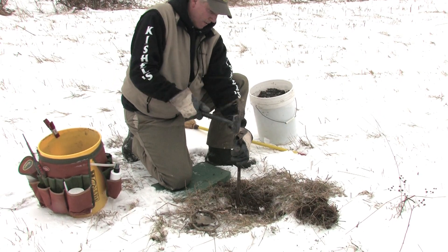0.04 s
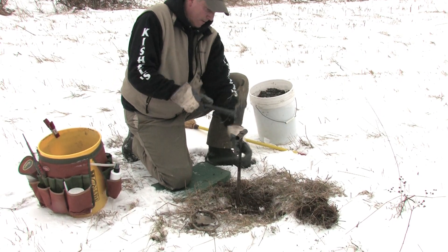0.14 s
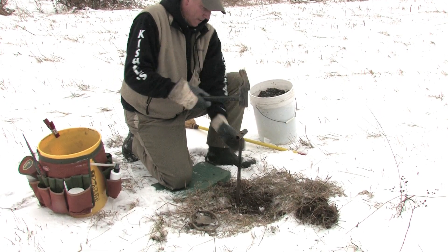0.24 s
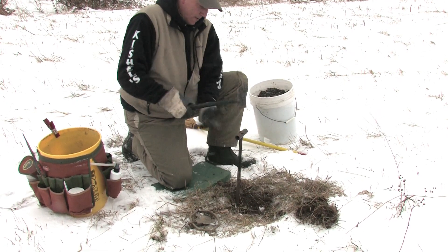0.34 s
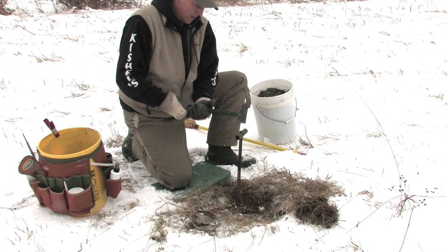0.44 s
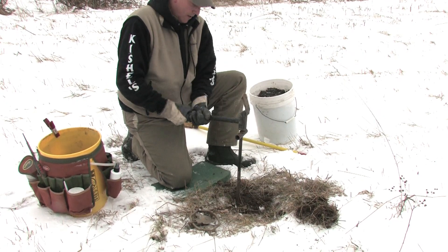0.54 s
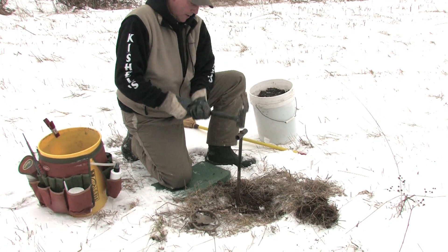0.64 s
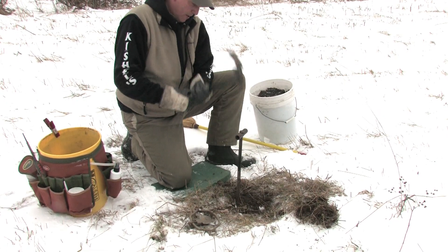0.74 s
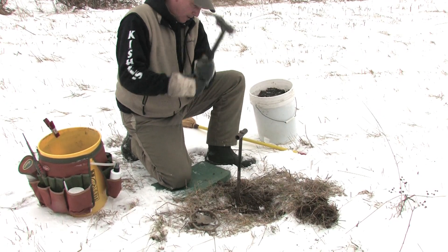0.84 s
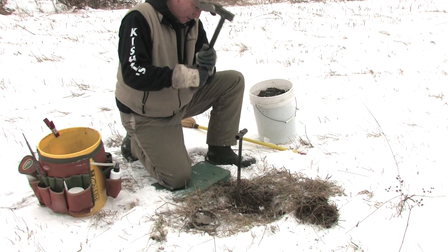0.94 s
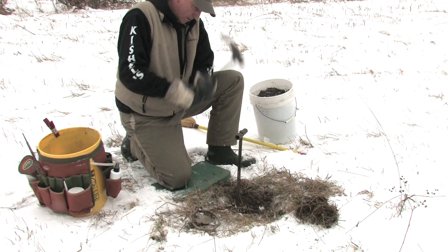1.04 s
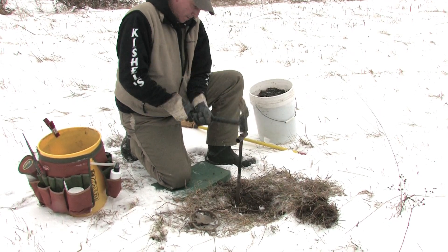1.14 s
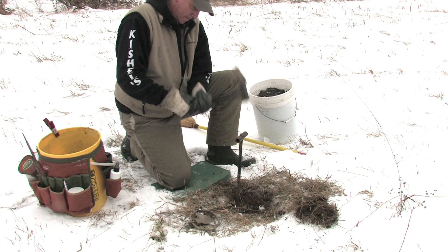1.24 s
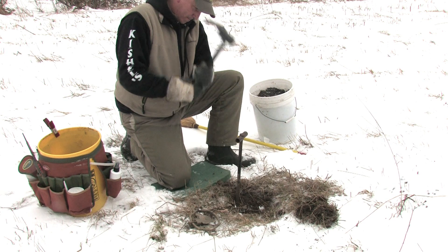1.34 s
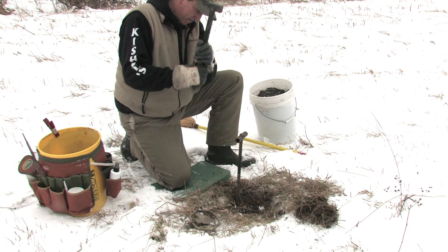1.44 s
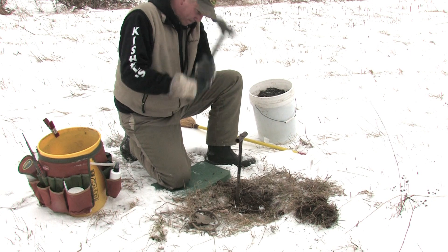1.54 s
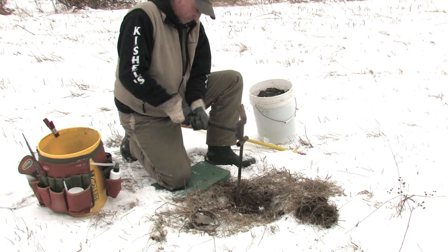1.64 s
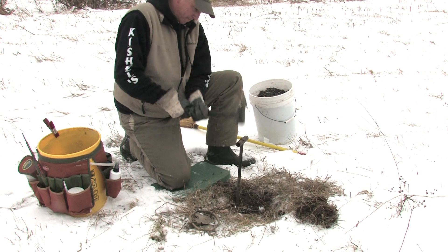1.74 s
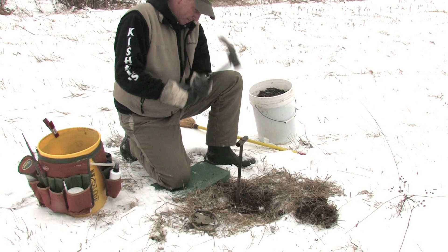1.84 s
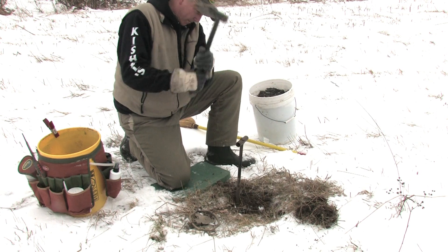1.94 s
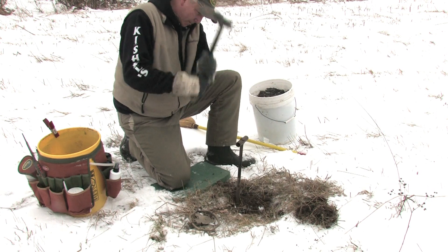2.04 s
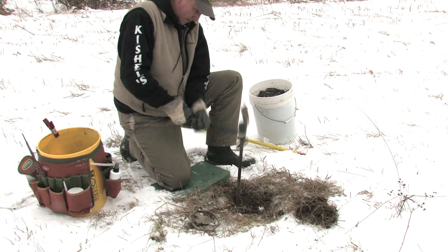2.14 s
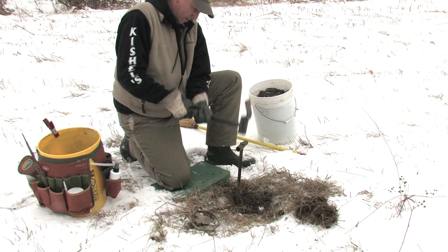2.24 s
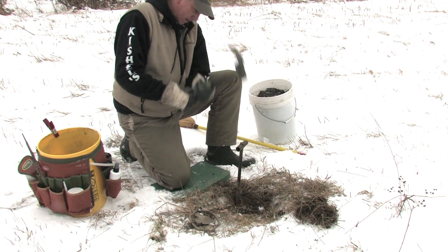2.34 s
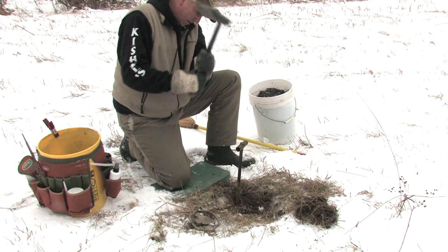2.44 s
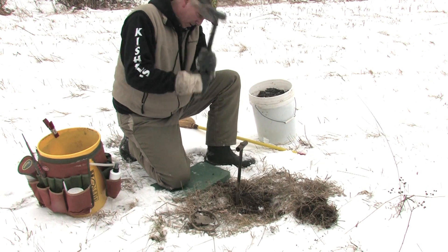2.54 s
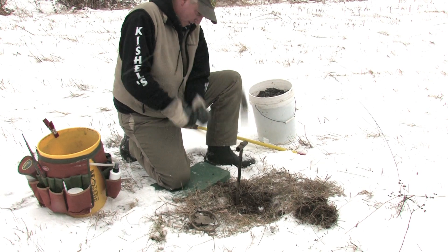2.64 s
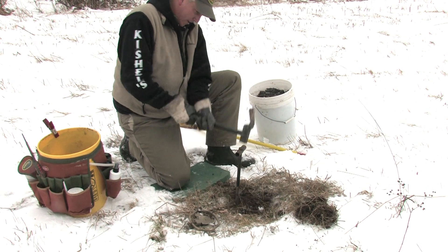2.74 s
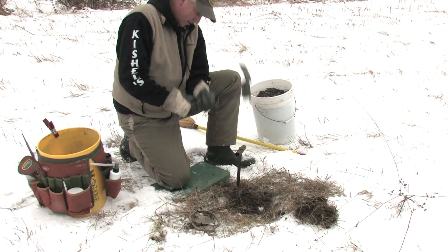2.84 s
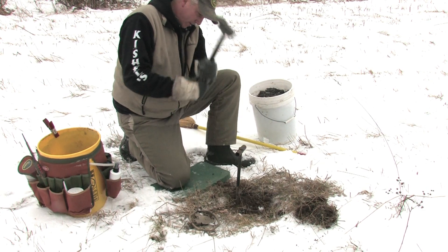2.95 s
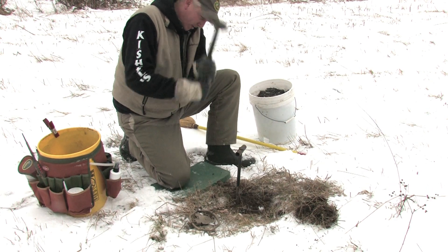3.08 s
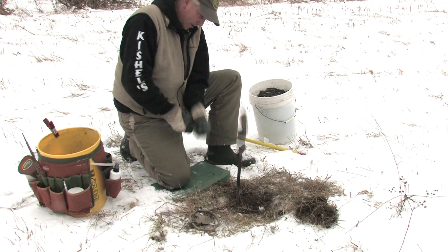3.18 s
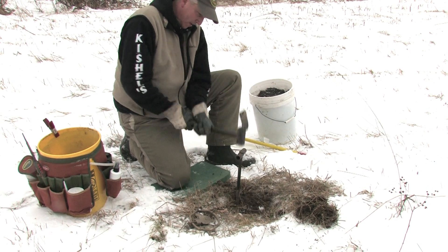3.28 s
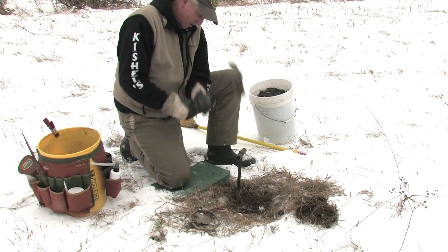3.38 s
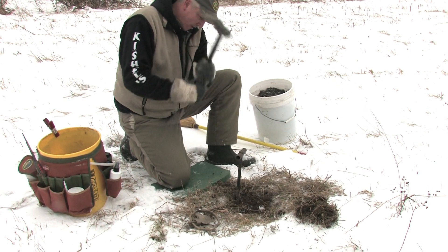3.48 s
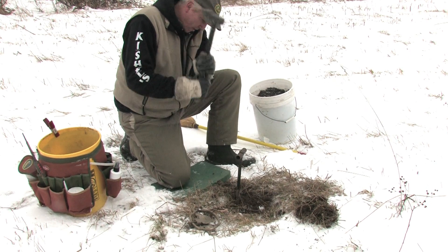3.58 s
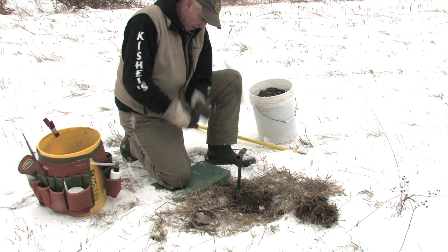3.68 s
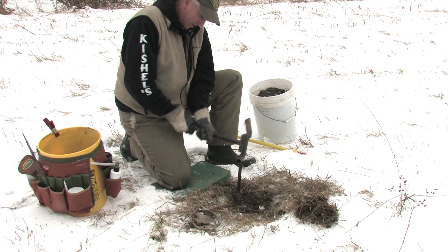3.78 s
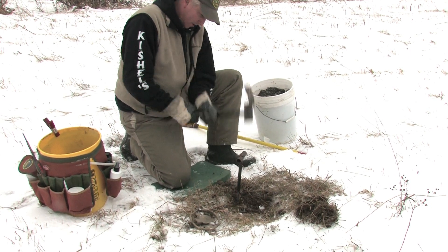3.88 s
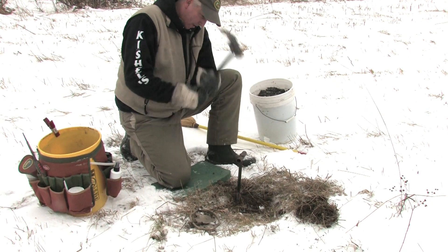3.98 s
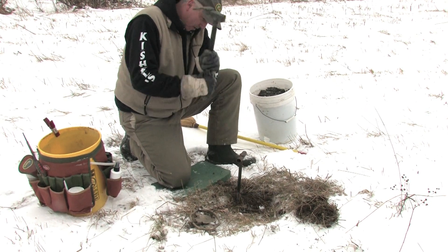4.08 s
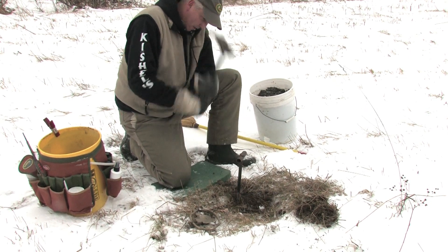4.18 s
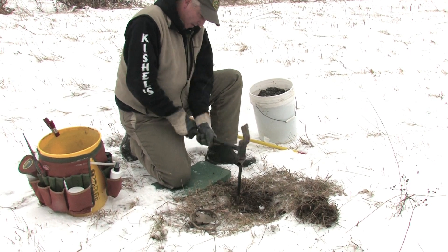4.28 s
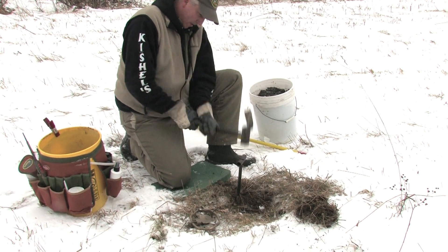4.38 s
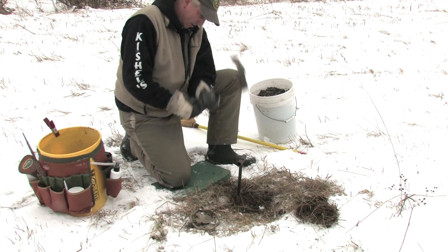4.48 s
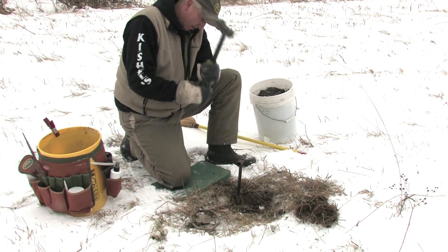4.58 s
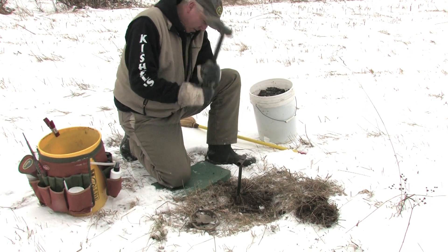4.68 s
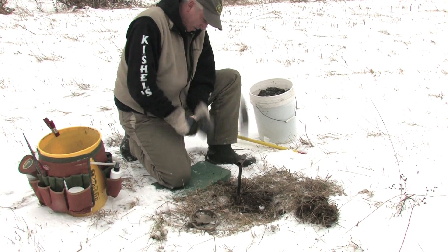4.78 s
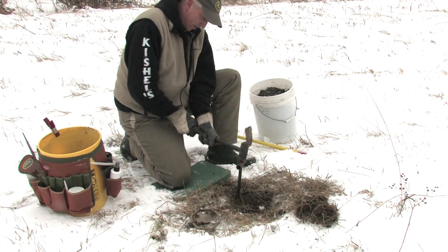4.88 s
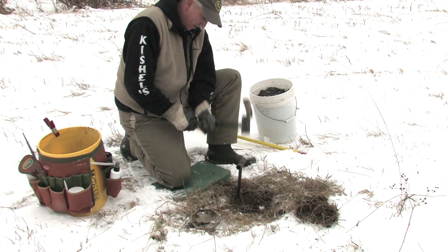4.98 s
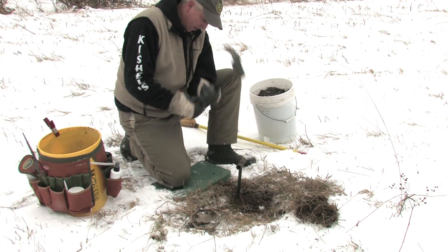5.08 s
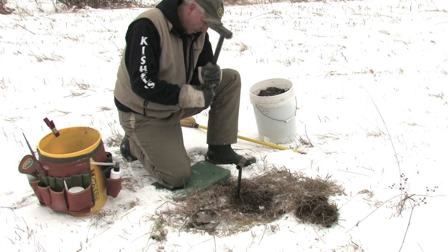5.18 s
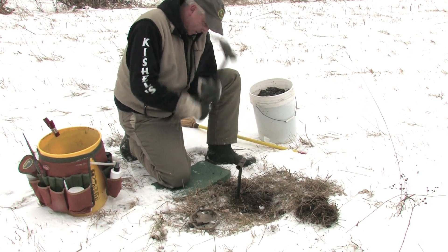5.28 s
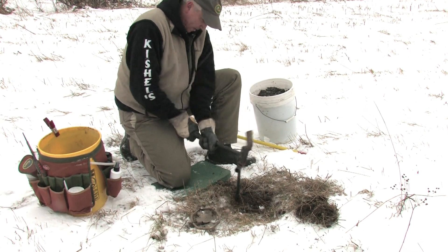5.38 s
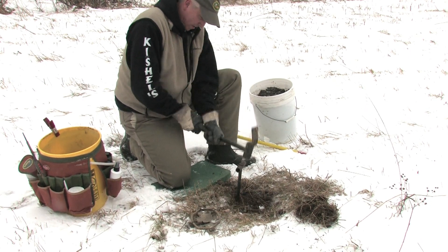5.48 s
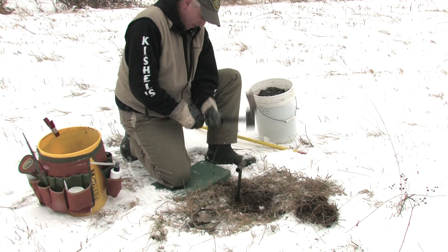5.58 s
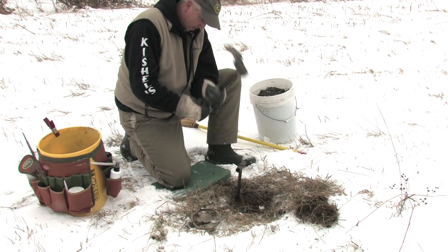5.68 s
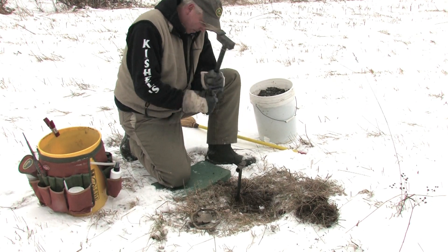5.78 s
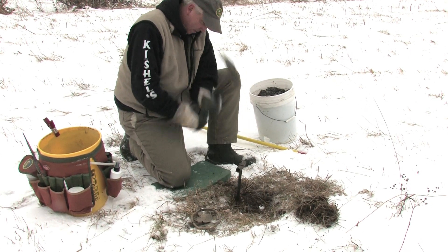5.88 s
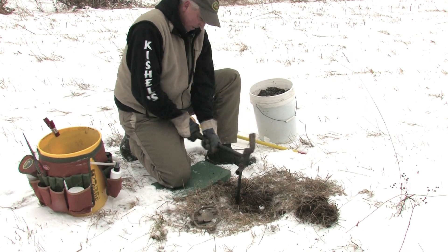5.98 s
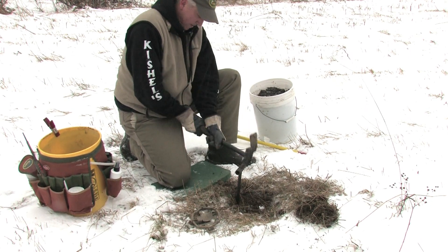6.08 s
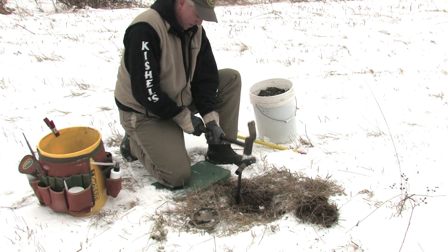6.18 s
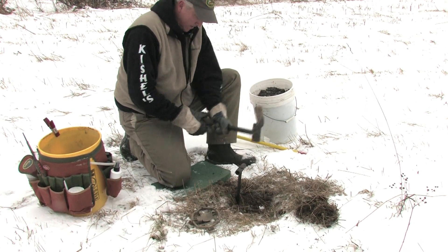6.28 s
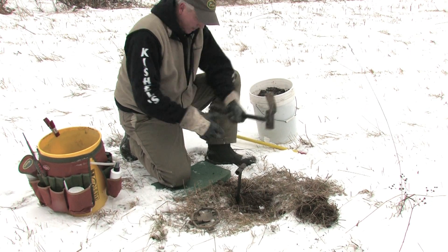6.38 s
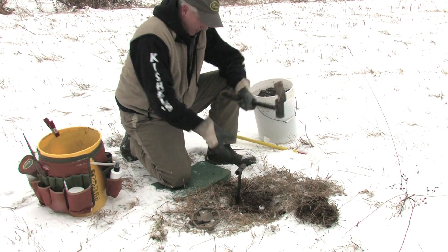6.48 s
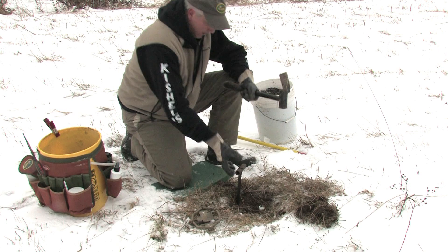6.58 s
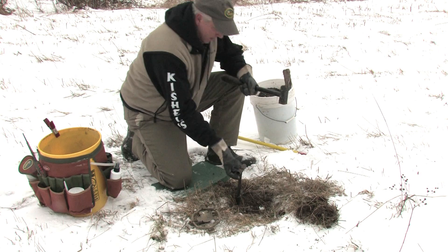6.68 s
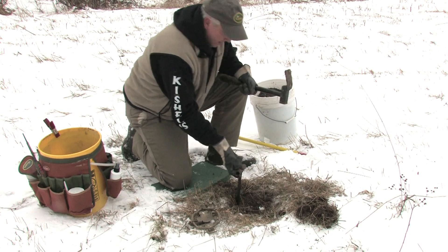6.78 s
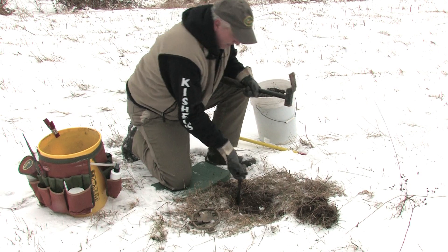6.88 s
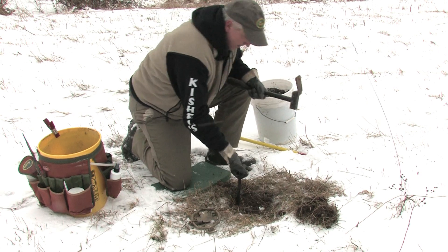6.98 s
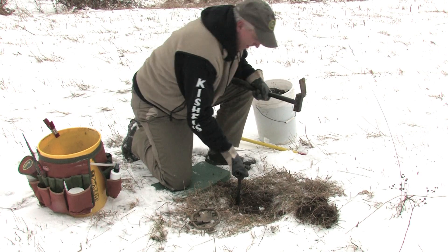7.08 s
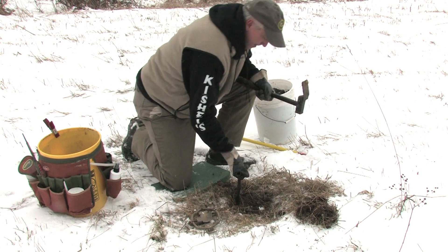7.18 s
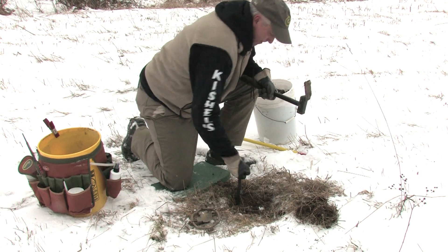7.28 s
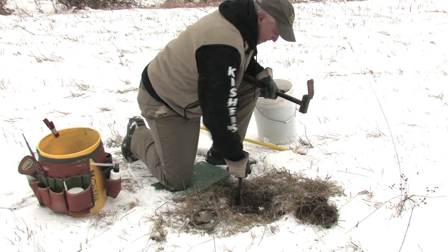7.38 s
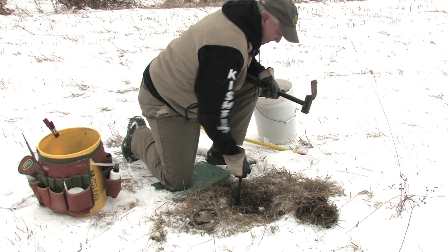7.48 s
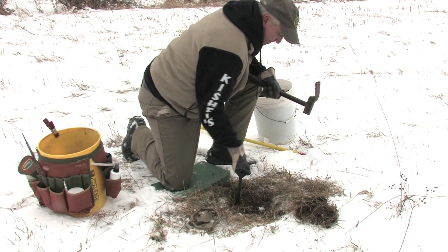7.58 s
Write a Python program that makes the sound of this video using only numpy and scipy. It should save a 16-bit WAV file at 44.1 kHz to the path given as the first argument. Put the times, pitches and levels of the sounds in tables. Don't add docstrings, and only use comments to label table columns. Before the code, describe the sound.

Loud steel-on-steel hammer blows, evenly spaced and nearly dry, ring out close to the microphone outdoors. Wind rumbles and knocks in the first few seconds, sinking under each hit and easing later. Clothing brushes softly between swings. The clanks begin dull and grow brighter as the stake sinks, with a thin high ring from the hammer head. They stop after ten, leaving faint hiss, rustling and several small ticks.

```python
import sys
import numpy as np
from scipy import signal
from scipy.fft import rfft, irfft
from scipy.io import wavfile

SR = 44100
rng = np.random.default_rng(int(sys.argv[2]) if len(sys.argv) > 2 else 0)


def dump(signal):
    limited = np.clip(np.atleast_2d(signal).T, -1, 1)
    pcm = np.round(limited * 32767).astype(np.int16)
    wavfile.write(sys.argv[1], SR, pcm)


def boost_factor(decibels):
    exponent = np.asarray(decibels, float) / 20
    return 10 ** exponent


N = 336483

# start_s, crack_db, thud_db, middle_modes_db, top_modes_db
BLOWS = [
    (1.1555, 3, -23.5, -22, -9.5),
    (1.6811, 3.5, -36.5, -16, -2),
    (2.1959, 6, -31, -13, 0.5),
    (2.7147, 5, -24.5, -10.5, 0.5),
    (3.2348, 5, -32, -12, 0.5),
    (3.7686, 5, -20.5, -12.5, 0),
    (4.3073, 7, -21.5, -10, 0.4),
    (4.8515, 6, -34, -8, 1),
    (5.4167, 5, -26.5, -9, 0),
    (5.9988, 5, -33, -10.5, -1),
]
# pitch_hz, level_db, t60_s
STAKE_MODES = [(45, -15, .15), (480, -5, .035), (640, -3, .035), (750, 2, .035), (850, 2, .14),
               (1398, 0, .055), (1620, -13, .035), (1950, -15, .03), (2160, -14, .025), (2400, -14, .025),
               (2590, 0, .048), (3110, -19, .025), (3960, -5, .04), (4090, -4, .04), (4250, -6, .04),
               (4720, -12, .022), (5270, -13, .022), (6350, -1, .022), (6980, -3, .022), (7500, -7, .03),
               (8040, -2, .045), (8230, -8, .04), (8800, -14, .025), (9600, -8, .028), (10200, -10, .025),
               (10860, -1, .06), (12400, -16, .018), (13930, -7, .028), (14500, -9, .035)]
# pitch_hz, level_db, t60_s
HEAD_MODES = [(10540, 0, .11), (10720, -10, .14), (10880, -25, .24), (10380, -15, .11), (8100, -46, .35)]
# pitch_hz, level_db, t60_s
FADING_TAP = [(950, -17.5, 0.12), (1460, 0.5, 0.0078), (2360, -11.5, 0.079), (3937, 2, 0.045),
              (6100, -12, 0.052), (8120, -4, 0.02), (10400, -6.5, 0.083), (10440, -16.5, 0.049),
              (10500, -24, 0.22)]
# freq_hz, level_db_per_hz
CRACK_SPECTRUM = [(100, -29.5), (1110, -21), (1500, -13), (2600, -6), (3200, -14), (4100, -7), (5200, -14),
                  (6900, -8.5), (10600, -14), (12000, -22.5), (15000, -21), (16300, -40)]
# delay_s, level_db
REBOUNDS = [
    (.0012, -8),
    (.0031, -9),
    (.0088, -16),
    (.0097, -12),
    (.0112, -18),
]
# delay_s, level_db, smear_s
ECHOES = [
    (.03, -71, .004),
    (.06, -61, .011),
]
# freq_hz, first_blow_db, last_blow_db
SINKING = [(870, -39, -34.5), (10300, -21, -14.5)]
MAIN_HZ = [1398, 2590, 4090, 8040, 13930]
VOICING = [(-4, -2, -7, -22.5, -20.5), (-8, -1.5, -6, -4, -21), (-10, 0, -4, -6, -15.5),
           (-12.5, -1, -8, -5.5, -15), (-10, -4.5, -3, -3, -9), (-18, -3, -4.5, -2, -11),
           (-15, -1.5, -5.5, -2, -8), (-21.5, -3, -3.5, -1, -9), (-22.5, -4, -3, -3, -11),
           (-23.5, -7, -1, -0.5, -7)]
# start_s, peak_db, pitch_hz, length_s
TICKS = [(0.4366, -23.5, 1500, 0.0024), (.4414, -24, 1500, 0.0027), (.5836, -37, 1930, 0.003),
         (1.264, -57.5, 7550, .0006), (1.416, -55.5, 7500, .0006), (1.984, -53, 4000, .001),
         (3.59, -53.5, 2500, .001), (6.29, -56, 3000, .002), (1.4424, -44.5, 3020, .001),
         (2.4544, -54, 3490, 0.0017), (3.7429, -48, 4070, 0.0011), (5.1674, -58.5, 2990, 0.0011),
         (5.2374, -53, 3960, 0.0011), (5.3614, -56.5, 5960, 0.0012), (6.0874, -48, 4060, 0.0026),
         (6.1034, -47, 3970, 0.0025), (6.2274, -55, 6000, 0.00091), (6.4174, -53, 2500, .001),
         (6.4574, -42, 8820, 0.00088), (6.6618, -39, 1000, 0.0018), (6.8094, -35.5, 10970, 0.0019),
         (6.8654, -58.5, 6930, 0.0011), (6.8828, -29, 1250, 0.0014), (6.9406, -39, 2148, 0.0034),
         (7.3292, -49, 2210, 0.00105), (7.4051, -21.5, 3280, 0.00098), (7.5494, -45, 10500, 0.0028)]
# peak_s, level_db, rise_s, fall_s,
# pitch_hz
SCRAPES = [
    (2.37, -68, .02, .1, 1780),
    (2.5, -66, .08, .08, 1780),
    (2.4, -72, .04, .2, 2600),
    (6.285, -69, .012, .07, 2520),
    (.85, -60, .05, .1, 1790),
    (.062, -66, .02, .04, 8050),
]
# peak_s, level_db, brightness_db, rise_s, fall_s
MOVES = [(.346, -60.5, 1, 0.14, 0.032), (.46, -64.5, -1.5, 0.011, 0.11), (.59, -47.5, -7.5, 0.011, 0.049),
         (.85, -58, -4, 0.15, 0.21), (1.03, -55.5, -8.5, 0.025, .05), (1.14, -51, -11, 0.0078, .02),
         (1.47, -58.5, -11.5, 0.12, 0.11), (1.986, -54.5, -6, .015, 0.005), (2.12, -59, -14, 0.059, .1),
         (2.36, -53, -7, .02, 0.078), (2.51, -56, -6, .06, .05), (3.058, -62.5, -2, 0.047, .15),
         (3.49, -58.5, -5, 0.031, .2), (3.73, -63, -1, 0.028, 0.029), (4.11, -60, -4.5, .03, 0.065),
         (4.594, -54, -4.5, 0.0052, 0.064), (5.172, -58, -3, 0.0297, .1), (5.36, -65, -3.5, .03, 0.029),
         (5.742, -59, -3, 0.0054, 0.057), (6.292, -55.5, -1, .004, .06), (6.32, -60, 6, .015, .012),
         (6.37, -60, 4, .012, .03), (6.398, -65, 13.5, 0.038, .005), (6.83, -60, -3, .2, .06),
         (6.935, -52, -4, 0.022, 0.076), (7.1, -63.5, -5, 0.13, 0.6)]
# freq_hz, level_db_per_hz
CLOTH_LOW = [(470, -32), (800, -1), (1230, -5.5), (1690, -3.5), (1820, -3), (2650, -7), (2890, -18),
             (3500, -15), (4550, -42.5), (7700, -120)]
# freq_hz, level_db_per_hz
CLOTH_HIGH = [(1760, -32.5), (3000, -10.5), (3600, -8), (3950, 2.5), (5040, -12), (5730, -11), (6460, -4.5),
              (7650, -8), (8350, -7), (9750, -12), (13700, -18), (14600, -24), (15000, -46)]
# freq_hz, level_db_per_hz
HISS = [(290, -30), (500, 2.5), (1080, -9.5), (1830, -7.5), (3060, -19), (4100, -17), (5740, -26.5),
        (8130, -11.5), (11200, -19), (14000, -20)]
# time_s, level_db
BREEZE = [(0, -44), (.47, -38), (.67, -26), (1.1, -27.5), (1.55, -24.5), (1.85, -38), (2.19, -21),
          (2.56, -37.5), (2.88, -30), (3.15, -34.5), (3.6, -38.5), (4.15, -28.5), (4.29, -43.5), (4.8, -50),
          (5.2, -46.5), (5.92, -57.5), (6.1, -50.5), (7.63, -49)]
# peak_s, level_db, rise_s, fall_s
GUSTS = [(0.175, -35, 0.034, 0.0091), (1.031, -18.5, 0.081, 0.043), (1.148, -21, 0.017, 0.015),
         (1.81, -29, .03, 0.01), (2.63, -25.5, .02, 0.085), (3.22, -32, .03, .03), (3.57, -33, .05, 0.013),
         (5.4, -45.5, 0.081, 0.035), (6.358, -37.5, .006, 0.0061), (6.8, -42, .01, 0.092),
         (7.178, -42.5, 0.017, 0.029), (7.324, -38, 0.053, 0.035), (7.63, -44.5, .08, .05)]
# start_s, peak_db, pitch_hz
BUFFETS = [(0.401, -39, 247), (0.857, -24, 244), (0.887, -35.5, 229.6), (0.979, -21.5, 238),
           (1.126, -19.5, 250), (1.502, -35, 244), (2.125, -30.5, 248), (2.311, -47, 251.4),
           (2.579, -51, 251.4), (2.621, -36, 241), (4.114, -34, 246), (6.354, -51, 252)]
# freq_hz, level_db_per_hz
RUMBLE = [(12, -42), (20, -16), (48, -3.5), (70, 1.5), (123, 1.5), (242, -5), (348, -11), (398, -16.5),
          (500, -24), (650, -46.5), (1100, -120)]
# freq_hz, level_db_per_hz
EDGE = [(200, -26.5), (320, 1), (600, 2), (1000, -18.5), (1600, -27), (2500, -39)]
# freq_hz, correlation
LIKENESS = [(60, 0.21), (130, 0.37), (290, 0.025), (640, 0.044), (1410, 0.91), (3100, 0.48), (6820, 0.98),
            (15000, 0.95)]

HEAD_FIRST_DB, HEAD_LAST_DB = -51, -72
CLAW_GAIN_DB, GRIP_CURVE = 30, 0.83
RING_FIRST, RING_LAST = 0.9, 0.8
SHANK_HZ, SHANK_DB, SHANK_T60_S = 848, -38, 0.14
SHANK_BEST_DEPTH, SHANK_LOSS_DB = 0.86, 85
MAIN_REBOUND_SHARE = 0.5
CHATTER_DB = 1.0
DUCK_DB, DUCK_FALL_S = 16, 0.019
CLANG_DUCK_SHARE, HEAD_DUCK_SHARE = 0.55, 0.27
PULL_DB, TAP_PULL_DB, CLIMB_DB_PER_S = 20, 10.5, 24.5
PULL_LAG_S, PULL_TIME_S = 0.01, 0.037
SCRAPE_WIDTH_HZ = 170
STILL_DB, STILL_BRIGHT_DB = -67, -72.5
SWING_DB, SWING_BRIGHT_DB, SWING_S, SETTLE_S = -57.5, -61, 0.073, 0.16
HISS_DB, AIR_CUT_HZ = -74.5, 14150
EDGE_AT_30_DB, EDGE_SLOPE = -41.5, 0.97
BLOW_SWELL_DB, BLOW_SWELL_S = -40, 0.012
TOP_CUT_HZ = 15900


def rms_one(x):
    return x / np.sqrt(np.mean(x ** 2) + 1e-20)


def at_hz(points, hz):
    points = np.array(points)
    return np.interp(np.log(hz), np.log(points[:, 0]), points[:, 1])


def bandpass(x, low_hz, high_hz, order=2):
    return signal.sosfilt(signal.butter(order, [low_hz, high_hz], "band", fs=SR, output="sos"), x)


def drift(rate_hz):
    r = np.exp(-80 * np.pi * rate_hz / SR)
    slow = signal.lfilter([1], [1, -2 * r, r * r], rng.standard_normal(N // 40 + 2002))[2000:]
    return np.interp(np.arange(N) / 40, np.arange(len(slow)), rms_one(slow))


def add(out, sound, start_s):
    i = round(start_s * SR)
    out[..., i:i + sound.shape[-1]] += sound[..., :out.shape[-1] - i]


def modes(hz, db, t60_s, count):
    t = np.arange(count) / SR
    gains = boost_factor(db) * rng.choice([-1, 1], len(hz))
    decay = boost_factor(-60 * np.outer(1 / np.asarray(t60_s), t))
    return gains @ (np.sin(2 * np.pi * np.outer(hz, t)) * decay)


def coloured(spectrum, count):
    hz = np.arange(count // 2 + 1) * SR / count + 1
    return rms_one(irfft(rfft(rng.standard_normal(count)) * boost_factor(at_hz(spectrum, hz)), count))


def humps(peak_s, db, rise_s, fall_s):
    peak_s, db, rise_s, fall_s = [np.reshape(v, (-1, 1)) for v in (peak_s, db, rise_s, fall_s)]
    t = np.arange(0, N + 32, 32) / SR - peak_s
    span = np.maximum(np.where(t < 0, rise_s, fall_s), 1e-3)
    power = np.sum((boost_factor(db) * np.exp(-np.abs(t) / span)) ** 2, axis=0)
    return np.interp(np.arange(N), 32 * np.arange(len(power)), power)


def stake_ring(middle_db, thud_db, top_db, voicing_db, depth, count):
    hz, db, t60_s = np.transpose(STAKE_MODES)
    share = [(640, thud_db + 3.5), (6500, middle_db), *zip(MAIN_HZ, voicing_db)]
    for f, first_db, last_db in SINKING:
        share.append((f, first_db + (last_db - first_db) * depth + top_db * (f > 7000)))
    main = np.isin(hz, MAIN_HZ)
    hz = hz * (1 + 0.004 * rng.standard_normal(len(hz)))
    db = db + at_hz(sorted(share), hz) + rng.normal(0, 1, len(hz))
    t60_s = t60_s * (RING_FIRST + (RING_LAST - RING_FIRST) * depth)
    return [modes(hz[k], db[k], t60_s[k], count) for k in (main, ~main)]


def shank_hum(depth, count):
    db = SHANK_DB - SHANK_LOSS_DB * abs(depth - SHANK_BEST_DEPTH)
    return modes([SHANK_HZ], [db], [SHANK_T60_S], count)


def impact_crack(force_db, count):
    t = np.arange(count) / SR
    dying = boost_factor(-60 * t / 0.01) + boost_factor(-15 - 60 * t / 0.044)
    return bandpass(coloured(CRACK_SPECTRUM, count) * boost_factor(force_db - 9.0) * dying, 600, 16000)


def contact_train():
    contacts = np.zeros(SR // 50)
    contacts[0] = 1
    for delay_s, level_db in REBOUNDS:
        i = int(np.clip(delay_s * rng.uniform(0.91, 1.05) * SR, 1, len(contacts) - 1))
        contacts[i] = boost_factor(level_db + rng.normal(0, 0.67)) * rng.choice([-1, 1])
    return contacts


def head_ring(depth, wobble):
    hz, db, t60_s = np.transpose(HEAD_MODES)
    grip = depth ** GRIP_CURVE
    head_db = HEAD_FIRST_DB + (HEAD_LAST_DB - HEAD_FIRST_DB) * grip
    claw_db = CLAW_GAIN_DB * grip * (hz == hz.min())
    ring = modes(hz, db + head_db + 30.5 + claw_db, t60_s, len(wobble))
    t = np.arange(len(wobble)) / SR
    return ring * boost_factor(4 * wobble * np.minimum(t / 0.05, 1))


def blow(force_db, thud_db, middle_db, top_db, voicing_db, depth):
    count = SR // 4
    t = np.arange(count) / SR
    clang, ringing = stake_ring(middle_db, thud_db, top_db, voicing_db, depth, count)
    shank = shank_hum(depth, count)
    crack = impact_crack(force_db, count)
    contacts = contact_train()
    wobble = coloured([(20, -0.5), (120, -6.0), (300, -37.0)], count)
    head = head_ring(depth, wobble)
    duck = boost_factor(-DUCK_DB * (1 - np.exp(-(t / DUCK_FALL_S) ** 3)))
    struck = signal.fftconvolve(ringing + crack + MAIN_REBOUND_SHARE * clang, contacts)[:count]
    out = struck * boost_factor(CHATTER_DB * wobble) * duck
    out += (1 - MAIN_REBOUND_SHARE) * clang * duck ** CLANG_DUCK_SHARE
    return out + (head + shank) * duck ** HEAD_DUCK_SHARE


def hammering():
    out = np.zeros(N)
    t = np.arange(SR // 200) / SR
    for depth, (start_s, *levels), voicing_db in zip(np.linspace(0, 1, len(BLOWS)), BLOWS, VOICING):
        add(out, blow(*levels, voicing_db, depth), start_s + 0.00054)
        run_up = coloured([(300, -28.5), (2500, 2), (9000, -4.5), (15000, -10.5)], len(t))
        add(out, run_up * boost_factor(-52 + 34 * t / t[-1]), start_s + 0.0005 - t[-1])
    hz, db, t60_s = np.transpose(FADING_TAP)
    add(out, modes(hz, db - 26.5, np.minimum(t60_s, 0.3), SR // 4), 0)
    count = len(t) * 4
    add(out, coloured(CRACK_SPECTRUM, count) * boost_factor(-32.0 - 1500 * np.arange(count) / SR), 0)
    return out


def field(x):
    answer = np.zeros((2, SR // 8))
    t = np.arange(SR // 8) / SR
    spectrum = [(500, -5.0), (3000, -5.0), (8500, 0.5), (11000, 1.5), (12000, -11.5), (15000, -30.5)]
    for delay_s, level_db, smear_s in ECHOES:
        hump = np.exp(-0.5 * ((t - delay_s) / smear_s) ** 2)
        answer += boost_factor(level_db) * coloured(spectrum, len(t)) * hump / np.sqrt(smear_s * SR)
    near = bandpass(rng.standard_normal(len(t)) * boost_factor(-60 * t / 0.019), 1500, 2800, order=5)
    answer += boost_factor(-33.5) * near * [[1], [-1]]
    return signal.fftconvolve(x[None], answer, axes=1)[:, :N]


def ticks():
    out = np.zeros(N)
    t = np.arange(SR // 20) / SR
    for start_s, peak_db, hz, length_s in TICKS:
        spray = rng.standard_normal(len(t)) * np.exp(-t / max(length_s, 1e-4))
        spray[0] = 4.7
        snap = bandpass(spray, hz / 3.8, min(hz * 2.4, 0.45 * SR)) + boost_factor(-20.5) * spray
        add(out, boost_factor(peak_db - 1.5) * snap / np.abs(snap).max(), start_s)
    return signal.sosfilt(signal.butter(8, 14300, fs=SR, output="sos"), out + 1e-18)


def scrapes():
    out = np.zeros(N)
    for peak_s, db, rise_s, fall_s, hz in SCRAPES:
        rub = bandpass(rng.standard_normal(N), hz - SCRAPE_WIDTH_HZ / 2, hz + SCRAPE_WIDTH_HZ / 2)
        out += np.sqrt(humps(peak_s, db, rise_s, fall_s)) * rms_one(rub)
    return out


def recorder_gain():
    t, down_db = np.arange(N) / SR, np.zeros(N)
    for start_s, pull_db in [(-0.044, TAP_PULL_DB)] + [(row[0], PULL_DB) for row in BLOWS]:
        since_s = t - start_s - PULL_LAG_S
        grip = np.clip(since_s / PULL_TIME_S, 0, 1)
        down_db = np.maximum(down_db, grip * (pull_db - CLIMB_DB_PER_S * since_s))
    return boost_factor(-down_db)


def clothing():
    peak_s, db, bright_db, rise_s, fall_s = np.transpose(MOVES)
    swing = humps([row[0] for row in BLOWS], 0, SWING_S, SETTLE_S)
    gain = recorder_gain()
    dull = humps(peak_s, db, rise_s, fall_s) + boost_factor(SWING_DB) ** 2 * swing + boost_factor(STILL_DB) ** 2
    bright = humps(peak_s, db + bright_db, rise_s, fall_s)
    bright = bright + boost_factor(SWING_BRIGHT_DB) ** 2 * swing + boost_factor(STILL_BRIGHT_DB) ** 2
    flicker_db = 1.3 * drift(30) + 1.4 * drift(80)
    low = coloured([(500, -54.5), *CLOTH_LOW], N)
    high = coloured([*CLOTH_HIGH, (17000, -73.0)], N)
    grains = rng.standard_normal(N) * (rng.random(N) < 10.0 / SR)
    crackle = boost_factor(11) * bandpass(grains + 1e-18, 3000, 13000)
    low = gain * np.sqrt(dull) * boost_factor(1.5 + flicker_db) * low
    high = gain * np.sqrt(bright) * boost_factor(0.8 + flicker_db) * (high + crackle)
    air = low + high + boost_factor(HISS_DB - 3.5) * coloured(HISS, N)
    return signal.sosfilt(signal.cheby2(12, 50, AIR_CUT_HZ, fs=SR, output="sos"), air)


def gusty(spectrum, patchy_db, lumps_hz):
    out, together = 0, drift(lumps_hz)
    low_hz, high_hz = spectrum[0][0], spectrum[-1][0]
    edges = low_hz * 2 ** np.arange(0, np.log2(high_hz / low_hz) + 0.5, 0.5)
    white = rng.standard_normal((2, 2, N))
    for k, (low, high) in enumerate(zip(edges, edges[1:])):
        mid, side = bandpass(white[k % 2], low, high)
        hz = np.sqrt(low * high)
        alike = np.clip(at_hz(LIKENESS, hz), 0, 1)
        gain = boost_factor(at_hz(spectrum, hz) + patchy_db * drift(lumps_hz))
        out = out + gain * (np.sqrt(1 + alike) * mid + np.sqrt(1 - alike) * side * [[1], [-1]])
    return rms_one(out) * boost_factor(patchy_db * together)


def buffet(peak_db, hz):
    t = np.arange(SR // 25) / SR
    spectrum = [(hz / 4, -12), (hz, 0), (hz * 3, -3), (hz * 8, -20), (hz * 20, -60)]
    puff = np.array([coloured(spectrum, len(t)) for port in range(2)])
    return boost_factor(peak_db - 8.0) * puff * np.minimum(t / 0.001, 1) * np.exp(-t / 0.0054)


def wind():
    time_s, breeze_db = np.transpose(BREEZE)
    breeze = boost_factor(np.interp(np.arange(N) / SR, time_s, breeze_db))
    rumble_db = 10 * np.log10(breeze ** 2 + humps(*np.transpose(GUSTS)))
    blow_swell = humps([row[0] for row in BLOWS], BLOW_SWELL_DB, BLOW_SWELL_S, BLOW_SWELL_S)
    edge_db = 10 * np.log10(boost_factor(EDGE_AT_30_DB + EDGE_SLOPE * (rumble_db + 30)) ** 2 + blow_swell)
    rumble = boost_factor(rumble_db) * gusty(RUMBLE, patchy_db=1.5, lumps_hz=16)
    edge = boost_factor(edge_db - 3.5) * gusty(EDGE, patchy_db=2.6, lumps_hz=30)
    out = boost_factor([[2.1], [1.9]]) * recorder_gain() * (rumble + edge)
    for start_s, peak_db, hz in BUFFETS:
        add(out, buffet(peak_db, hz), start_s)
    return out


def scene():
    around = wind() + clothing() + scrapes()
    hits = hammering()
    return around + hits * boost_factor([[0.04], [-0.04]]) + field(hits) + ticks()


def roll_off(x):
    return signal.sosfilt(signal.butter(12, 16460, fs=SR, output="sos"), x)


def record(dry):
    clipped = np.clip(dry, -0.98, 0.98)
    mix = signal.sosfilt(signal.butter(2, 28, "high", fs=SR, output="sos"), clipped)
    mix = signal.sosfilt(signal.butter(12, TOP_CUT_HZ, fs=SR, output="sos"), mix)
    return roll_off(mix)


dry = scene()
out = record(dry)
dump(out)
```